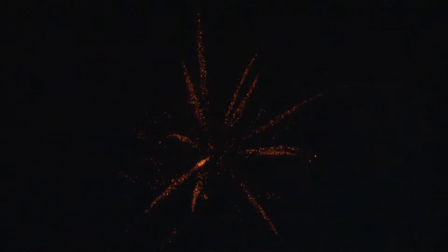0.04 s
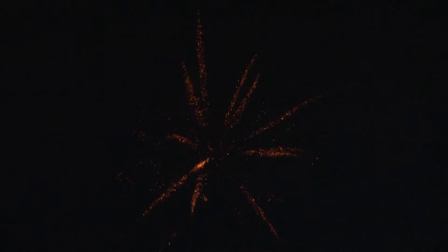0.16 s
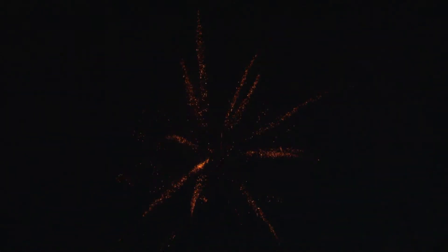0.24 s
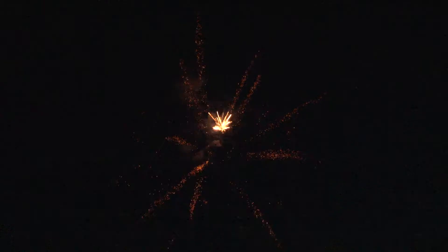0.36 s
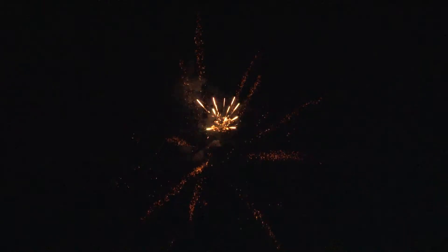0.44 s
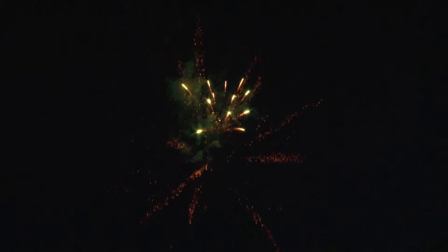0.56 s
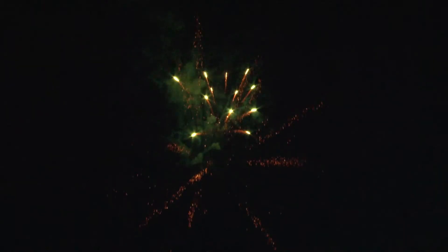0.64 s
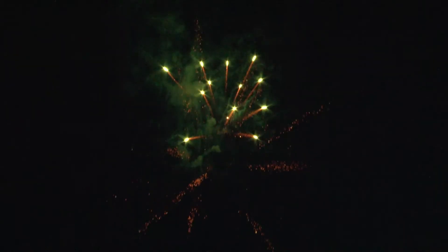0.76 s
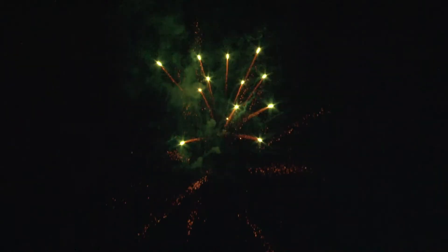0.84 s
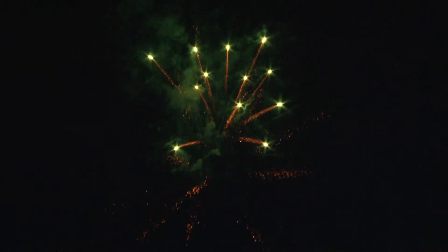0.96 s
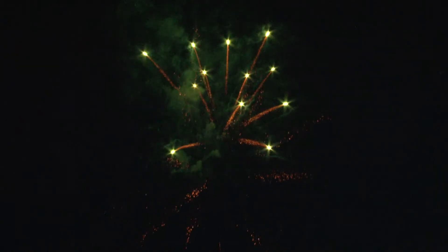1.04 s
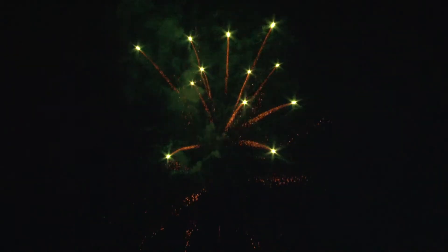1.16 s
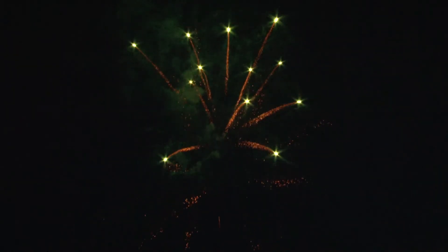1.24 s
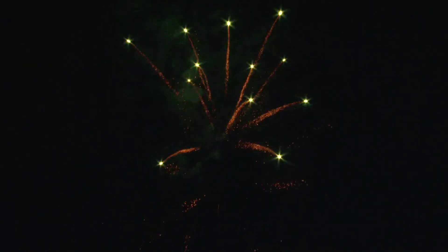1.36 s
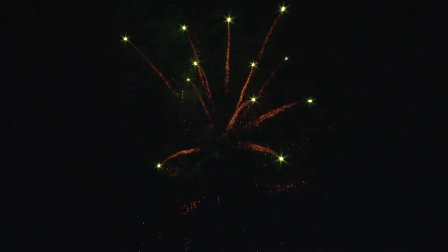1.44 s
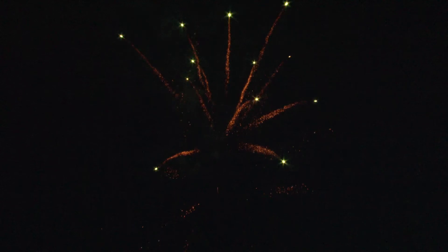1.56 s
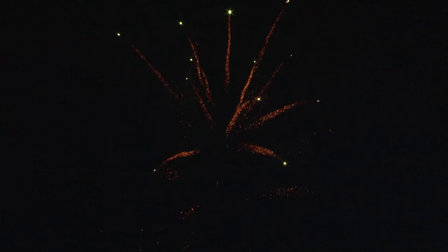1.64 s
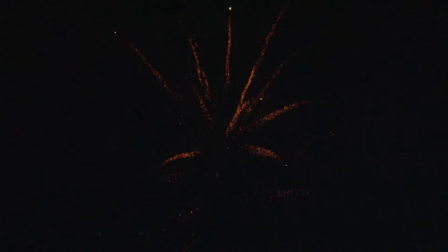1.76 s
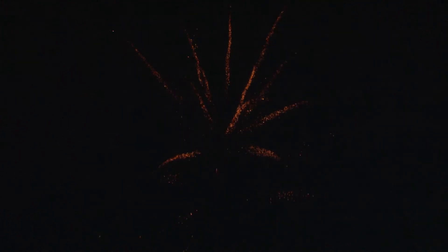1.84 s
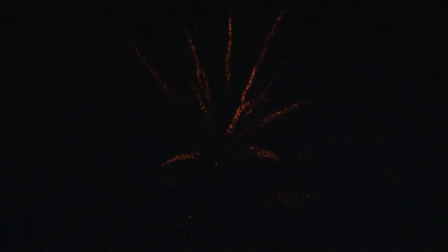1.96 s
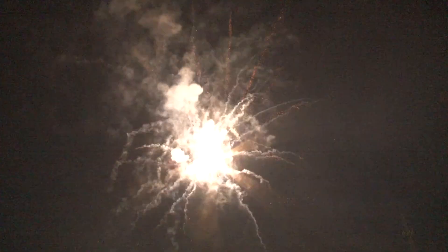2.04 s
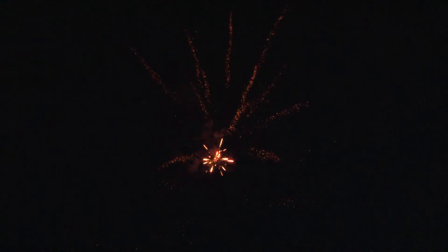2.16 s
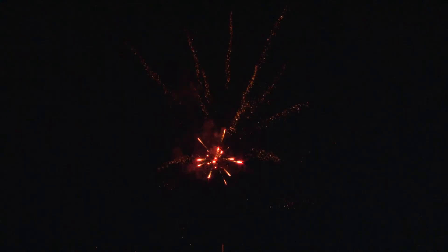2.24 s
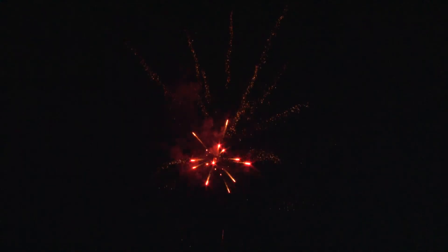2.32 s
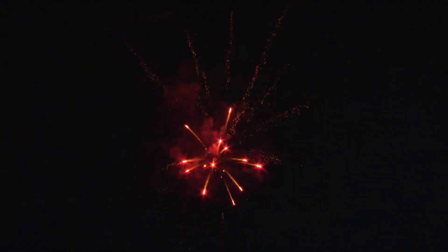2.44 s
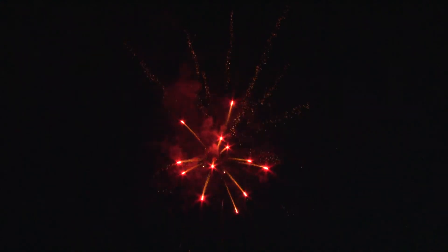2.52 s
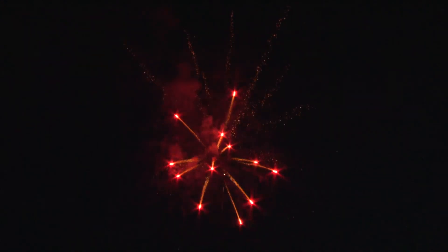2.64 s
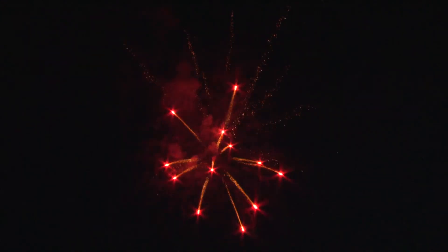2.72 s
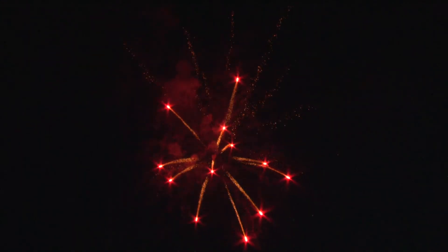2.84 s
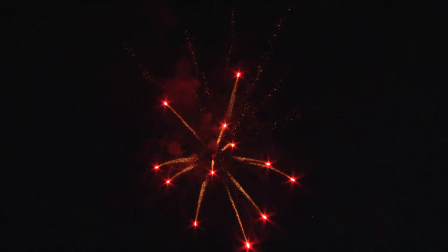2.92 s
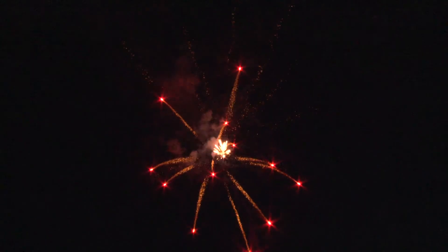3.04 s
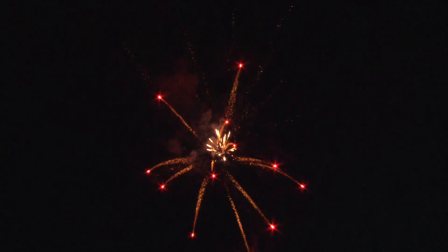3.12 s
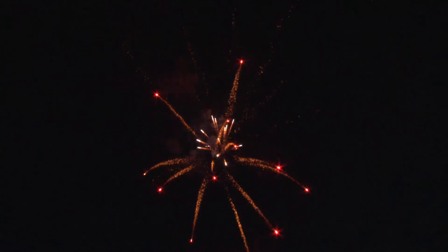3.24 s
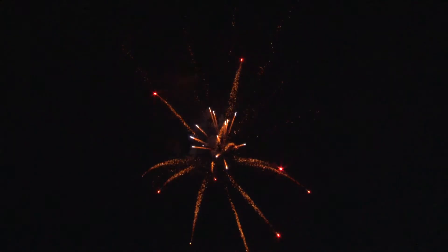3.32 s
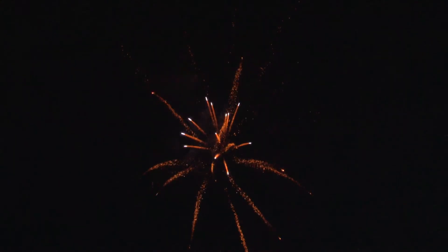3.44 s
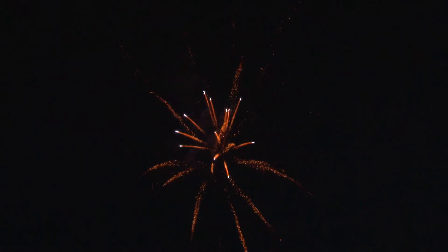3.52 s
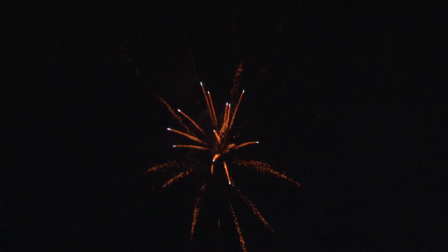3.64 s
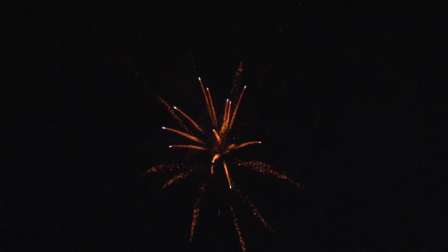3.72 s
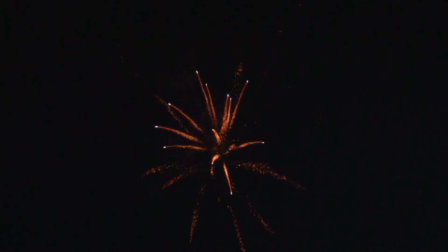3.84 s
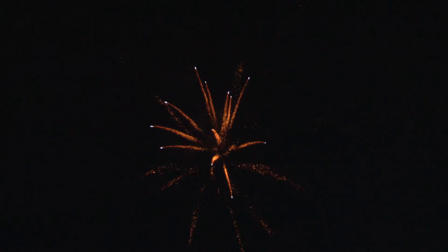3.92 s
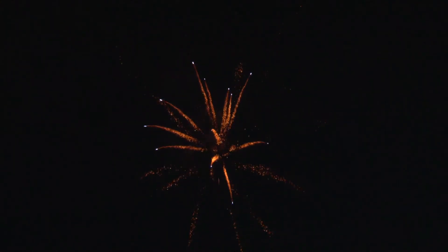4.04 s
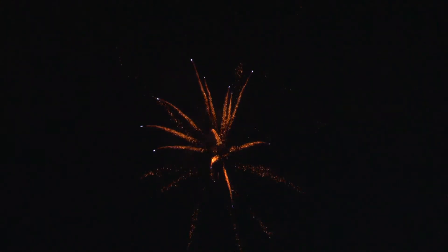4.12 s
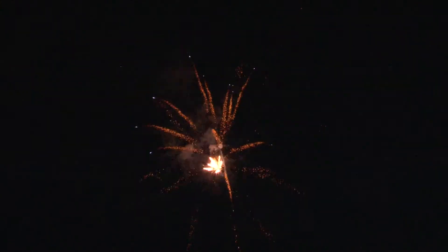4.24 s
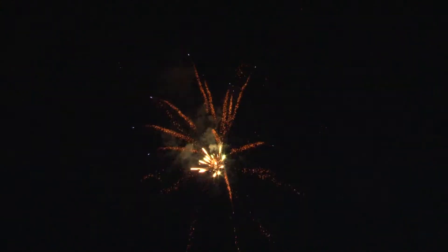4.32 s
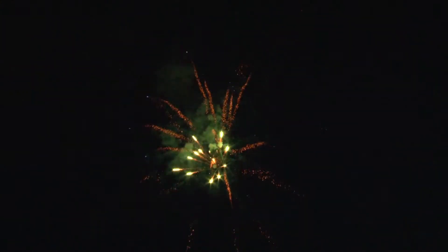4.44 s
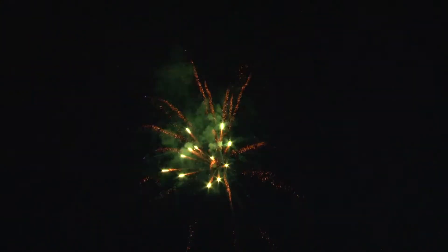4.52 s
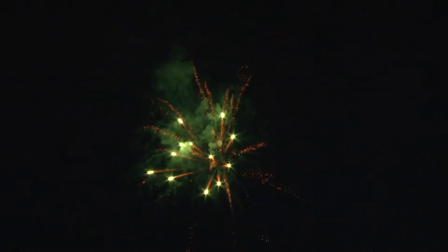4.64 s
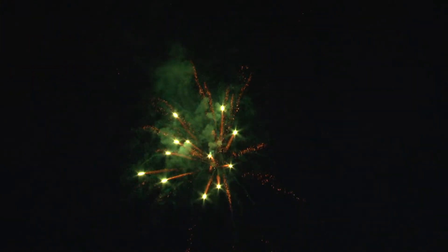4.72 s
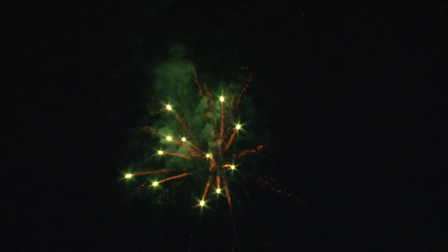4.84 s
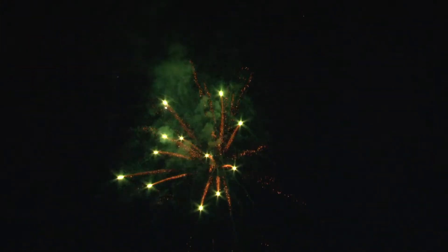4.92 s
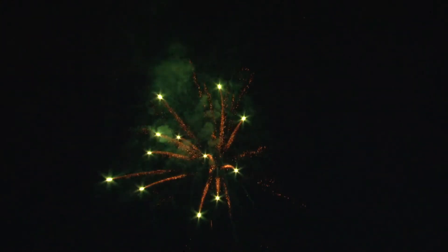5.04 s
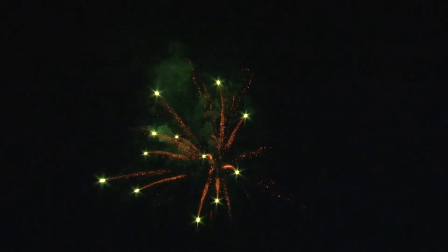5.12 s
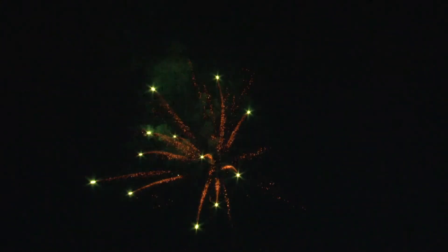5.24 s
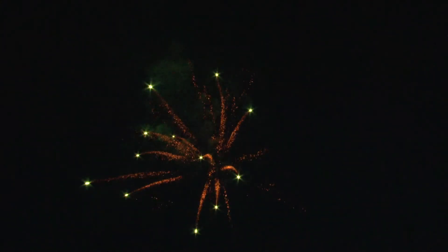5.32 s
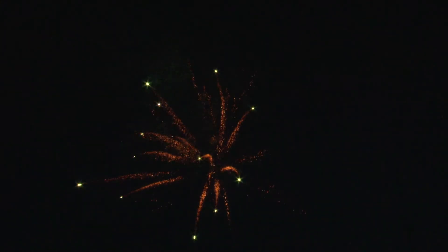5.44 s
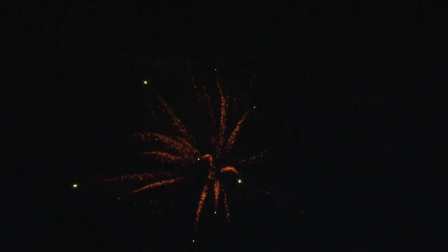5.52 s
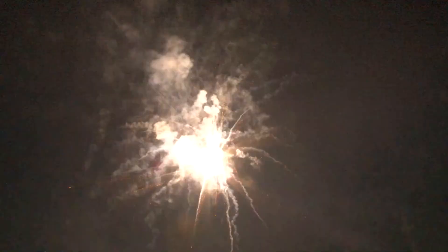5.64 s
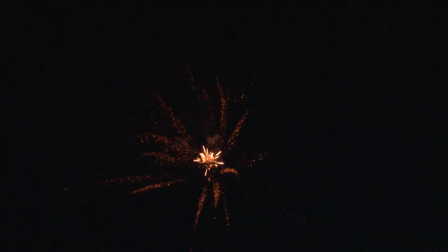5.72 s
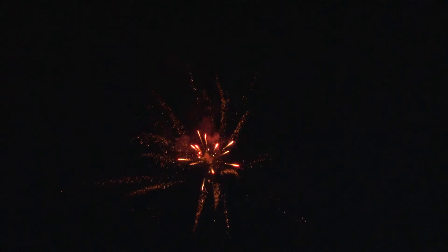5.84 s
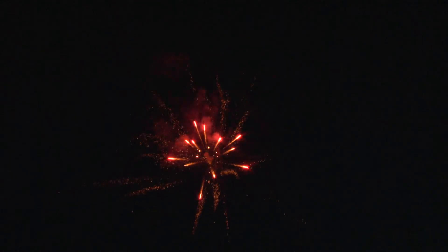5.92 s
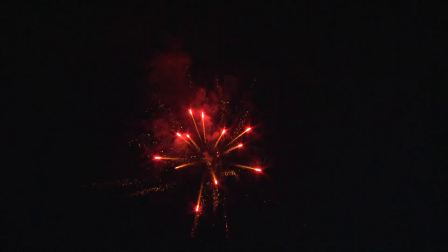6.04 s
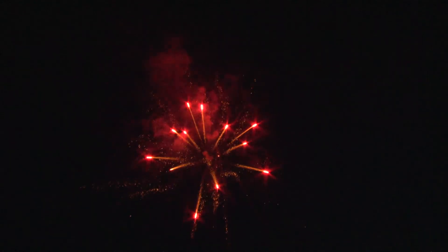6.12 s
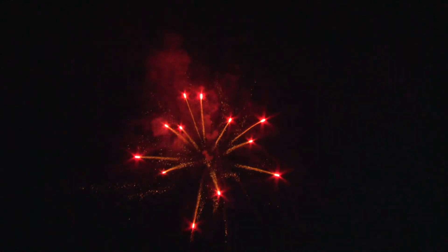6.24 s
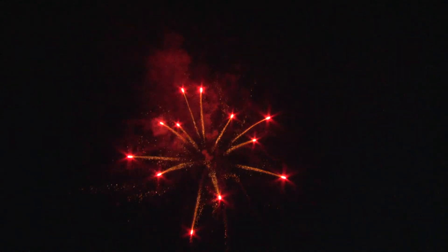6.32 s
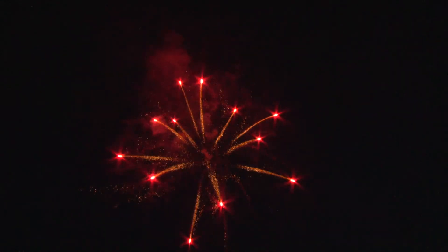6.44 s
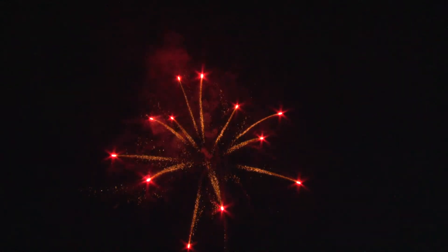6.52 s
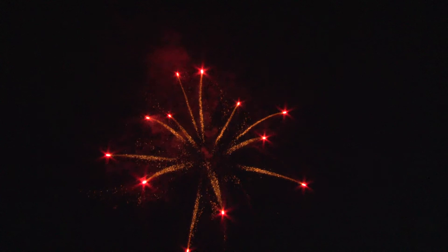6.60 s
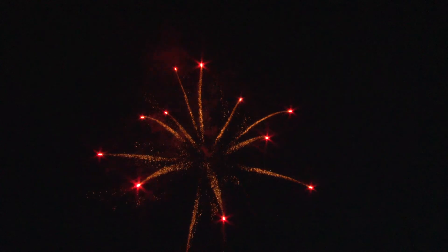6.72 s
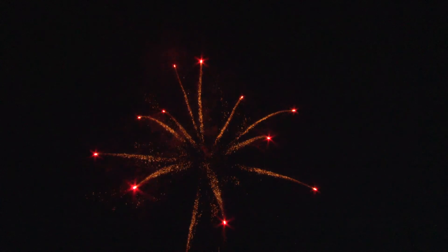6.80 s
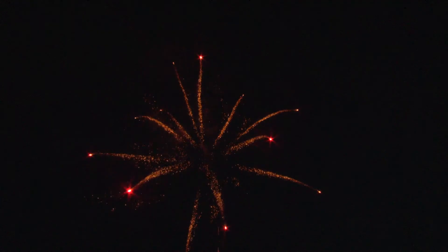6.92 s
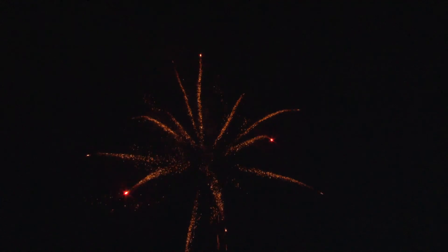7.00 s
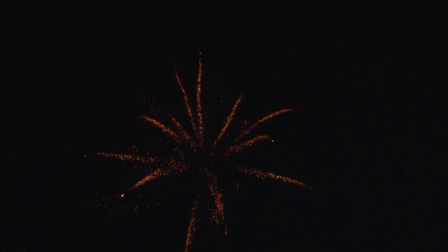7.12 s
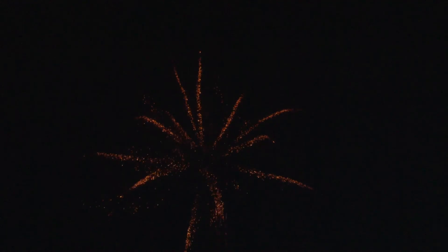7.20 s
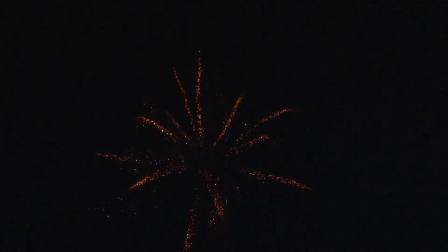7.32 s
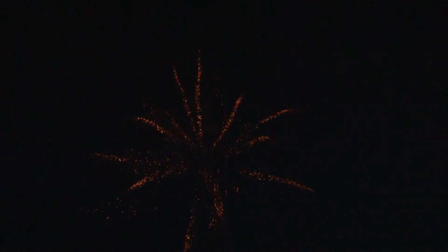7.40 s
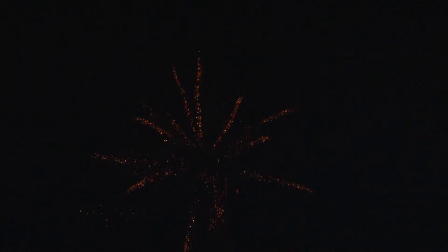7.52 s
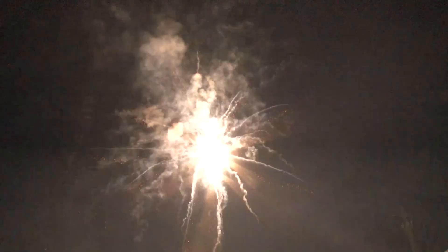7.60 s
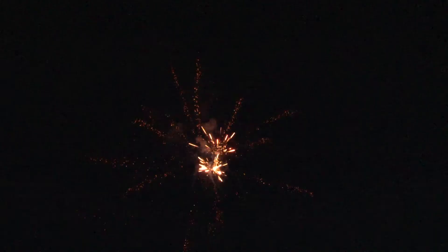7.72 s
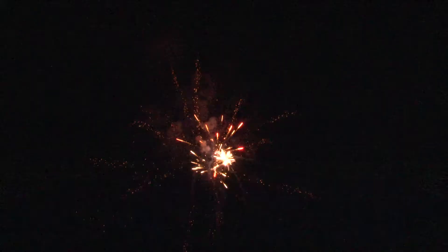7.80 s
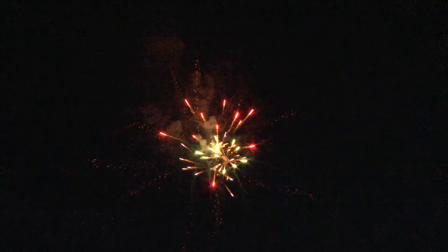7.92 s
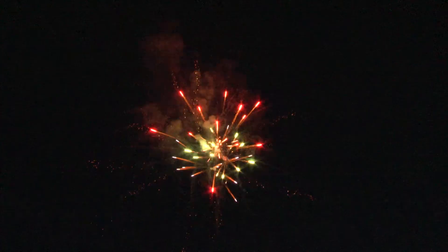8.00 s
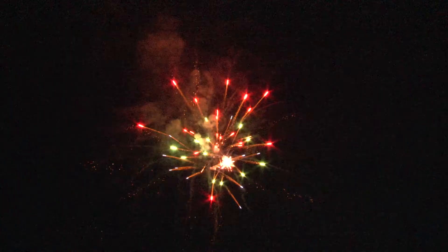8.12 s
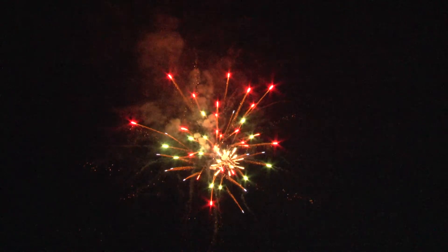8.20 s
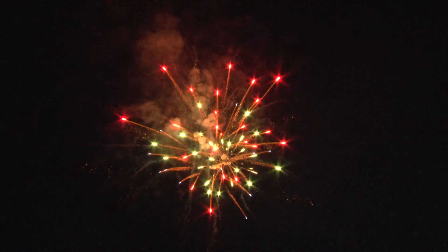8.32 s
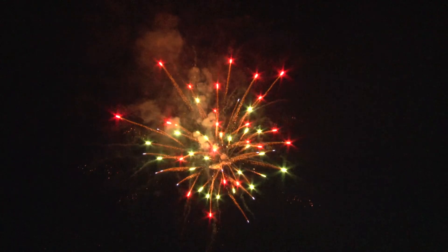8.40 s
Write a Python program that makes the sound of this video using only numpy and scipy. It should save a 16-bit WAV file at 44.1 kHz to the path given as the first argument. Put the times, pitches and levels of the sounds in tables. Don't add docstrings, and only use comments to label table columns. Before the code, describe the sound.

Outdoors at night in a built-up street, an earlier firework boom fades over faint traffic and insect hiss. Five separate shells burst overhead with hard cracks that overload the stereo microphone, each slapping back from house fronts and rolling away. Duller launch thumps come from tubes nearby, and small casings tick down at right. A quick run of thumps leads to a final tight volley of bangs.

```python
import sys
import numpy as np
from scipy import signal
from scipy.fft import rfft, irfft, next_fast_len
from scipy.io import wavfile
from scipy.ndimage import uniform_filter1d, map_coordinates

SR = 44100
rng = np.random.default_rng(int(sys.argv[2]) if len(sys.argv) > 2 else 0)


def makeup_ratio(level_db):
    decades = np.asarray(level_db, float) / 20
    return 10 ** decades


def store_wav(level_fs):
    pcm = np.round(np.clip(np.atleast_2d(level_fs), -1, 1) * 32767)
    wavfile.write(sys.argv[1], SR, pcm.T.astype(np.int16))


N = 373086
t = np.arange(SR // 8) / SR


def unit(x):
    return x / np.sqrt(np.mean(x ** 2) + 1e-20)


def along(points, hz):
    point_hz, value = np.transpose(points)
    return np.interp(np.log(hz + 1), np.log(point_hz + 1), value)


def add(track, s, sound, pan_db=0):
    part = track[:, round(s * SR):][:, :len(t)]
    sides = makeup_ratio([[pan_db / 2], [-pan_db / 2]])
    part += (sound * sides)[:, :part.shape[1]]


def shock(delay_ms, width_ms):
    u = np.maximum(t * 1000 - delay_ms, 0) / width_ms
    return (1 - u) * np.exp(-u) * np.minimum(u * 8, 1)


def puff(lo_hz, hi_hz, t60, alike):
    band = signal.butter(3, [lo_hz, hi_hz], "bandpass", fs=SR, output="sos")
    mid, side = unit(signal.sosfilt(band, rng.standard_normal((2, len(t)))))
    turn = np.arccos(np.clip(alike, 0, 1)) / 2
    pair = np.cos(turn) * mid + np.sin(turn) * side * np.array([[1], [-1]])
    return pair * makeup_ratio(-60 * t / max(t60, .003)) * (1 - np.exp(-t / 0.0002))


def coloured(x, spectrum):
    m = next_fast_len(N + 8192)
    gain = unit(makeup_ratio(along(spectrum, np.fft.rfftfreq(m, 1 / SR))))
    return irfft(rfft(x, m) * gain, m)[:, :N]


def field(power, spectrum, alike, grain_db):
    grains = makeup_ratio(grain_db * np.repeat(rng.standard_normal(N // 40 + 1), 40)[:N])
    swells = map_coordinates(rng.standard_normal(N // 300 + 4), [np.arange(N) / 300])
    clumps = makeup_ratio(grain_db * .6 * swells)
    noise = unit(rng.standard_normal((2, N)) * grains * clumps)
    hz, s, z = signal.stft(noise, SR, nperseg=256)
    turn = np.arccos(np.clip(along(alike, hz), 0, 1))[:, None] / 2
    mid, side = z * np.sqrt(power(hz[:, None], s)) * np.array([np.cos(turn), np.sin(turn)])
    pair = signal.istft(np.array([mid + side, mid - side]), SR, nperseg=256)[1]
    return coloured(pair[:, :N], spectrum)


# frequency in Hz, level in dB per Hz.
NIGHT_SPECTRUM = [(18, -60), (60, -21.5), (259, -0.5), (1130, -4.5), (1390, -11.5), (3330, -12.5),
                  (3560, -29.5), (4530, -20), (6700, -25.5), (7000, -14.5), (8250, -20.5), (8600, -35),
                  (11000, -41), (15000, -58)]


def night():
    level = lambda hz, s: makeup_ratio(2 * (-56 + np.sin(s * 2.13)))
    alike = [(100, 0.98), (3000, 0.85), (6000, 0.81), (9000, 1.0)]  # Hz, left-right likeness
    return field(level, NIGHT_SPECTRUM, alike, grain_db=1.4)


def scatter(lag, reflectors):
    total = 0
    for start, swell, db, fade in reflectors:
        late = np.maximum(lag - start, 0)
        total = total + (1 - np.exp(-late / abs(swell))) ** 2 * makeup_ratio(2 * (db - fade * late))
    return total


def ducked(s, start):
    later = [burst[0] for burst in BURSTS if burst[0] > start]
    return sum(-5 * (s > b) * np.exp(-((s - b) / .045) ** 4) for b in later)


def scraps(hz, s, share):
    top_hz = 13300
    chance = unit(uniform_filter1d(rng.standard_normal((20, len(s) // 8 + 1)), 3, axis=1))
    strip = np.clip((hz - top_hz) // 500, 0, 19).astype(int)
    heard = chance[strip, np.arange(len(s)) // 8] > share + .3 * strip
    return np.where(hz < top_hz, 1, heard)


# frequency in Hz, loss in dB per s.
AIR_LOSS = [(60, 4.5), (300, 4.5), (2000, 2.5), (5000, 9), (9000, 28), (14000, 47)]
# frequency in Hz, likeness of the two sides (0 to 1).
TAIL_ALIKE = [(60, 0.94), (130, 1), (290, 0.93), (640, 0.7), (1410, 0.79), (3100, 0.64), (6820, 0.76),
              (15000, 0.98)]


def answer(starts, tail_db, reflectors, spectrum, grain_db):
    def power(hz, s):
        total = 0
        for start, db, parts in zip(starts, tail_db, reflectors):
            lag = np.maximum(s - start - .003, 0)
            path = lag + .12 * np.exp(-lag / 0.014)
            level = db + ducked(s, start) - along(AIR_LOSS, hz) * path
            total = total + makeup_ratio(2 * level) * scatter(lag, parts)
        return total * scraps(hz, s, share=.3)
    return field(power, spectrum, TAIL_ALIKE, grain_db)


# start in seconds, tail in dB.
EARLIER_BURST = (-1.11, -20)
BURST_TAIL_DB = [-18.5, -19, -20.5, -18.5, -18.5, -21.5, -22, -19.5, -20, -17.5]
STREET_ROLL = {"lawn": (0, .0025, 9.5, 580), "shrubs": (0, .01, -9, 60), "street": (.064, .026, 7.5, 104),
               "block": (.1, .05, -4.5, 32), "town": (.2, .2, -21, 10.8)}
# swell in s, level in dB, fade in dB per s.
HOUSE_FRONT = (.005, 6.5, 330)
# frequency in Hz, level in dB per Hz.
BOOM_SPECTRUM = [(25, -59), (76, -23.5), (220, -3.5), (300, 0), (600, -0.5), (720, -7), (1120, -3.5),
                 (1400, -8), (3330, -13), (3700, -20.5), (4500, -17.5), (5350, -23.5), (7300, -22.5),
                 (16500, -51.5)]


def burst_tails():
    starts = [EARLIER_BURST[0], *[b[0] for b in BURSTS]]
    front_ms = [44, *[b[3] for b in BURSTS]]
    reflectors = [[*STREET_ROLL.values(), (ms / 1000 - .003, *HOUSE_FRONT)] for ms in front_ms]
    return answer(starts, [EARLIER_BURST[1], *BURST_TAIL_DB], reflectors, BOOM_SPECTRUM, grain_db=1.0)


# start in seconds, peak in dB, knock in dB, decay time t60 in s.
CASINGS = [(.1436, -58, 12, .032), (.3112, -29.5, -18, .049), (.3496, -52, 5, .06), (.3965, -46, -1, .039),
           (.4104, -54, 6, .17), (.4424, -53, 6, .06), (1.1483, -30.5, -24, .062), (1.6013, -56, 4, .076),
           (1.6417, -39.5, -4, .03), (1.7044, -51, 2, .03), (2.2214, -28, -3, .051), (2.9014, -50, 5, .049),
           (3.9144, -51, 9, .055), (4.0432, -42, 3, .039), (4.0554, -40, -5, .094),
           (5.2185, -45, -11, .071), (5.3273, -50, -7, .06), (5.5224, -57, 10, .093),
           (5.7274, -43.5, -13, .079), (5.8032, -53, 0, .072), (7.0863, -43, -5, .053),
           (7.0978, -39.5, -4, .06), (7.5278, -29.5, -5, .058), (7.5662, -48.5, 0, .18)]


def casings():
    out = np.zeros((2, N))
    for s, db, knock_db, t60 in CASINGS:
        hz = 2550 * rng.uniform(.85, 1.15)
        pan_db = -2.5 + rng.normal(0, 1)
        tick = makeup_ratio(3) * uniform_filter1d(shock(.3, width_ms=.14), 6)
        rattle = puff(0.65 * hz, min(3 * hz, 10000), t60, alike=0.77)
        knock = makeup_ratio(knock_db) * puff(330, 2900, t60, alike=0.49)
        add(out, s, makeup_ratio(db) * (tick + rattle + knock), pan_db)
    return out


def front(delay_ms, width_ms):
    u = (t * 1000 - delay_ms) / width_ms
    return np.clip(u * 9, 0, 1) * (1 - .25 * u) * np.clip((1 - u) * 5, 0, 1)


def capsule(x, hz, q):
    w = 2 * np.pi * hz
    return signal.lfilter(*signal.bilinear([1, 0, 0], [1, w / q, w * w], SR), x)


# start in seconds, peak in dB, ground copy in ms late, house front in ms late.
BURSTS = [
    (.6316, 4.5, 4.6, 46),
    (2.3654, 3, 4.5, 41),
    (3.2798, 1, 4.6, 44),
    (4.492, 3, 4.5, 44),
    (5.9523, 3.5, 4.5, 45),
    (7.9072, 4.5, 4.55, 45),
    (7.9411, -2.5, 4.3, 44),
    (8.0625, 3, 4.45, 44),
    (8.1794, 2.5, 4.65, 46),
    (8.4026, 3, 4.4, 43),
]
# delay in ms, level in dB.
GLINTS = [(.9, -9), (2.75, -1), (3.4, -4), (4.1, -7), (5.4, -11), (7.2, -9), (7.9, -11)]


def bursts():
    out = np.zeros((2, N))
    for s, db, ground_ms, _ in BURSTS:
        left_ms = .55 + rng.uniform(0, .12)
        blast = np.array([front(0, w) + makeup_ratio(-1) * front(ground_ms, .8 * w) for w in (left_ms, .51)])
        swing = capsule(blast, hz=450, q=1.1)
        rebound = sum(np.exp(-((t * 1000 - ms) / .25) ** 2) for ms in (2.05, ground_ms + 1.95))
        shift = rng.normal(0, .05, len(GLINTS))
        size = rng.normal(0, 1.4, (len(GLINTS), 2, 1))
        glints = 0
        for (ms, glint_db), m, z in zip(GLINTS, shift, size):
            glints = glints + makeup_ratio(glint_db + z) * shock(ms + m, width_ms=.24)
        soft = uniform_filter1d(1.15 * glints, 4, axis=1)
        fizz = makeup_ratio(-2) * puff(7500, 14500, .003, alike=.97) + makeup_ratio(-9) * puff(2300, 7000, .004, alike=.9)
        ground_fizz = makeup_ratio(-9) * np.roll(fizz, round(ground_ms * SR / 1000) + 8, axis=1)
        edge = np.roll(fizz, 6, axis=1) + ground_fizz
        add(out, s, makeup_ratio(db + 3) * (swing + .45 * rebound + soft + edge))
    return out


WALLS = {"front": (2, -6, -30, -4), "gable": (56.5, -13, -23, 6), "far": (92, -11, -33, 0)}


def walls():
    out = np.zeros((2, N))
    for s, peak_db, _, front_ms in BURSTS:
        for name, (ms, db, treble_db, pan_db) in WALLS.items():
            late_ms = ms + front_ms * (name == "front")
            size = makeup_ratio(peak_db - 3 + rng.normal(0, 2))
            blunt = uniform_filter1d(shock(.1, width_ms=0.32), size=5)
            body = makeup_ratio(db - 5) * (blunt + makeup_ratio(-11) * puff(230, 2270, 0.044, alike=1.0))
            edge = makeup_ratio(treble_db + 4) * puff(2500, 10000, .014, alike=.85)
            add(out, s + late_ms / 1000, size * (body + edge), pan_db)
    return out


# start in seconds, peak in dB, ring of the tube's mouth in Hz, ring in dB.
LIFTS = [
    (1.9053, -11.5, 1750, -8),
    (3.1448, -10.5, 1750, -7),
    (6.5008, -11.5, 2450, -3),
    (6.5641, -12.5, 2450, -3),
    (6.5978, -11, 2450, -3),
    (6.6305, -11.5, 2450, -3),
    (6.662, -12.5, 2450, -4),
]
# frequency in Hz, level in dB, decay time t60 in s.
BOX_AND_TUBE = [(178, -5.5, .1), (1120, -8, .02)]
# delay in ms, level in dB, top frequency in Hz.
YARD_WALLS = [(0, 0, 12000), (24.5, -8, 4800), (31.5, -3, 6800), (42.5, -2, 3800)]


def lifts():
    out = np.zeros((2, N))
    for s, db, mouth_hz, mouth_db in LIFTS:
        modes = [*BOX_AND_TUBE, (mouth_hz, mouth_db + 2, .012)]
        for ms, echo_db, top_hz in YARD_WALLS:
            echo = ms > 0
            size = rng.normal(0, 1.5, 4)
            ring = 0
            for (hz, ring_db, t60), z in zip(modes[echo:], size):
                ring = ring + makeup_ratio(ring_db + z - 60 * t / t60) * np.sin(2 * np.pi * hz * t)
            crack = 2.4 * shock(0, width_ms=.2) + 1.4 * (not echo) * shock(.9, width_ms=.17)
            edge = makeup_ratio(-11) * puff(.82 * top_hz, top_hz, .008, alike=.9)
            edge = edge + makeup_ratio(-16) * puff(800, 3300, .02, alike=.8)
            lowpass = signal.butter(2, min(top_hz, 4800), fs=SR, output="sos")
            dull = signal.sosfilt(lowpass, crack - ring * (1 - np.exp(-t / .0006)))
            add(out, s + ms / 1000, makeup_ratio(db + echo_db + size[-1] * echo) * (dull + edge))
    return out


LIFT_TAIL_DB = [-26.5, -26, -29, -28.5, -32, -28.5, -27.5]
YARD_ROLL = {"box": (0, .0012, -2.5, 65), "yard": (.022, .004, 6.5, 420), "street": (.04, .08, -7.5, 36),
             "town": (.2, .2, -18, 21)}
# frequency in Hz, level in dB per Hz.
THUMP_SPECTRUM = [(15, -74), (40, -26), (172, -2), (500, -1), (1220, 0.5), (2400, -4.5), (3330, -6.5),
                  (3650, -14), (4500, -10.5), (5350, -17.5), (6300, -13), (11600, -31), (13200, -37),
                  (16500, -58)]


def lift_tails():
    reflectors = [[*YARD_ROLL.values()]] * len(LIFTS)
    return answer([e[0] for e in LIFTS], LIFT_TAIL_DB, reflectors, THUMP_SPECTRUM, grain_db=1.5)


# frequency in Hz, gain in dB.
MICROPHONE = [(25, -55), (100, -23), (200, -4.5), (500, 0), (750, -2.5), (1120, -2), (3300, 0), (3800, -7),
              (4500, 0), (5400, -8), (6800, -8), (12000, -14.5), (16500, -21), (16900, -35)]


def microphone(x):
    cepstrum = irfft(np.log(makeup_ratio(along(MICROPHONE, np.fft.rfftfreq(4096, 1 / SR)))))
    cepstrum[1:2048] *= 2
    cepstrum[2049:] = 0
    response = irfft(np.exp(rfft(cepstrum)))[None]
    return signal.fftconvolve(x, response, axes=1)[:, :x.shape[1]]


def scene():
    near = casings() + bursts() + walls() + lifts()
    return night() + burst_tails() + microphone(near) + lift_tails()


def roll_off(x):
    return signal.sosfilt(signal.butter(12, 16840, fs=SR, output="sos"), x)


def record(dry):
    clipped = dry / (1 + np.abs(dry / .97) ** 10) ** (1 / 10)
    highpass = signal.butter(2, 40, "highpass", fs=SR, output="sos")
    steady = signal.sosfilt(highpass, clipped)
    return roll_off(steady)


dry = scene()
out = record(dry)
store_wav(out)
```